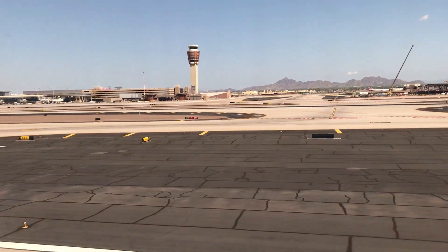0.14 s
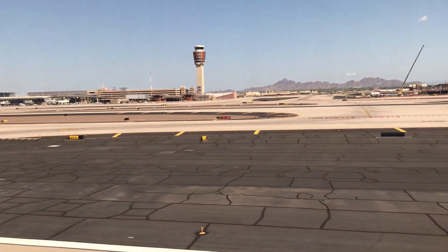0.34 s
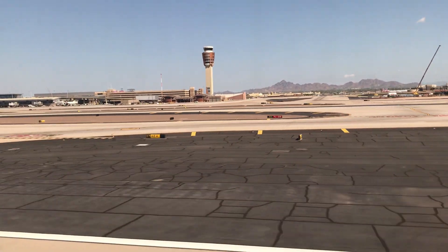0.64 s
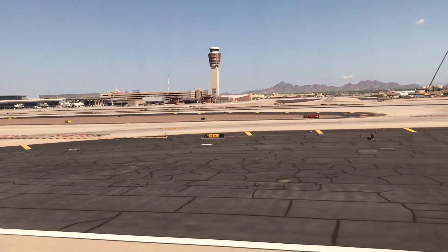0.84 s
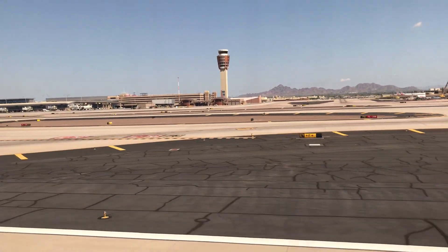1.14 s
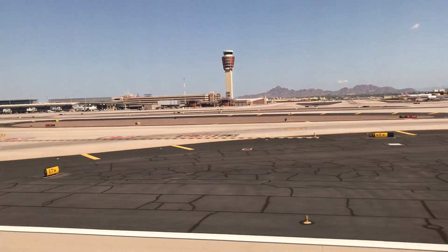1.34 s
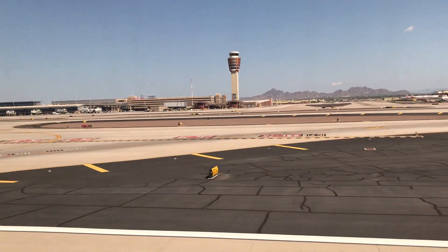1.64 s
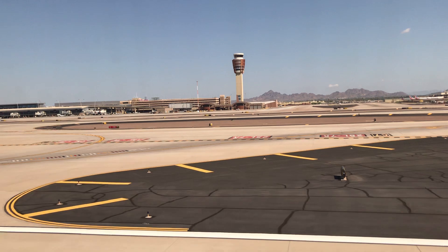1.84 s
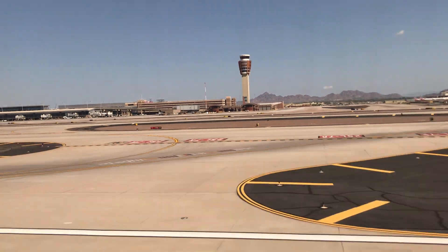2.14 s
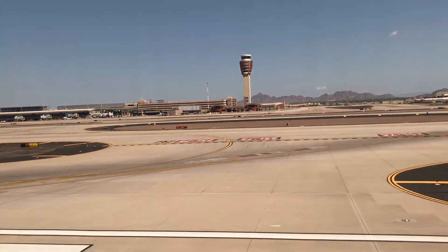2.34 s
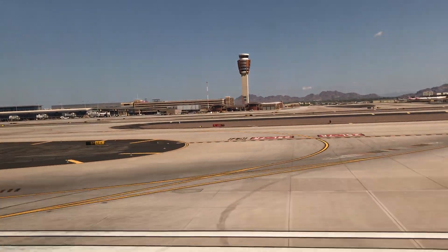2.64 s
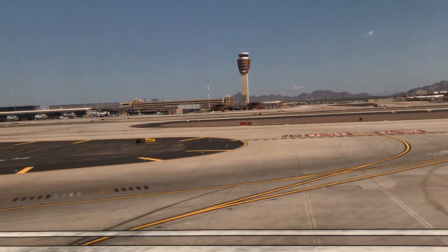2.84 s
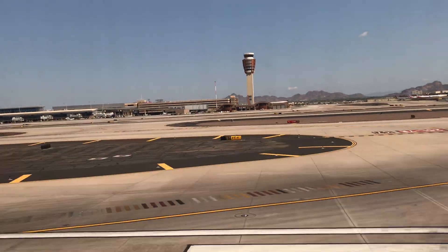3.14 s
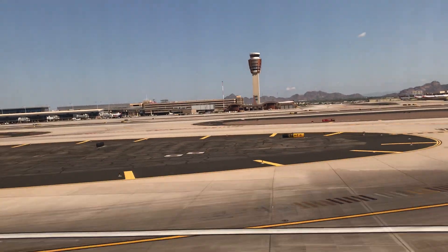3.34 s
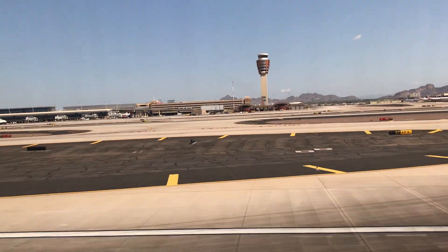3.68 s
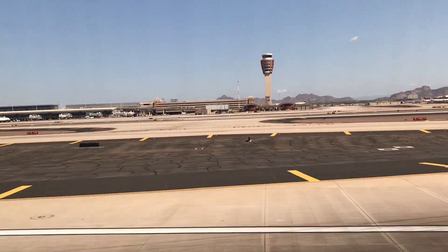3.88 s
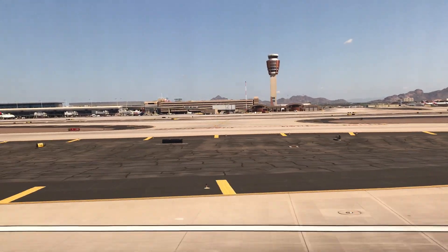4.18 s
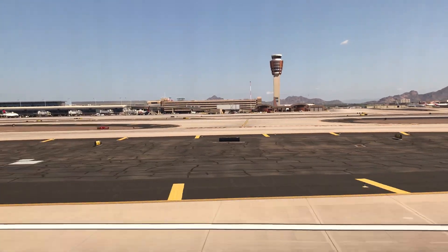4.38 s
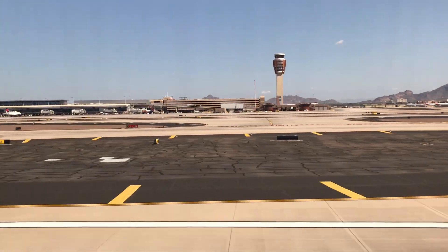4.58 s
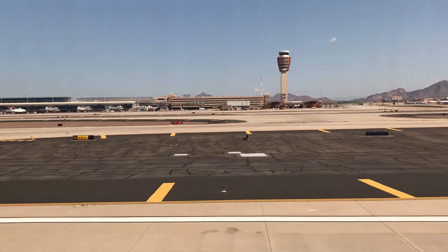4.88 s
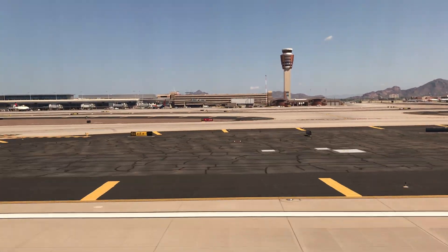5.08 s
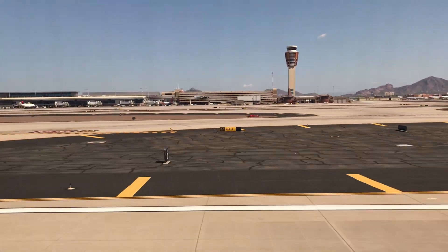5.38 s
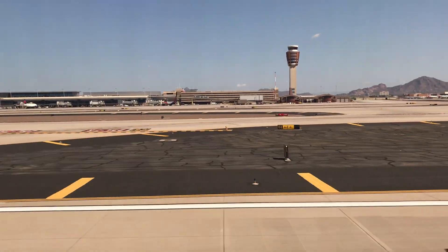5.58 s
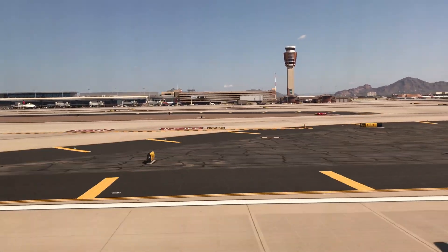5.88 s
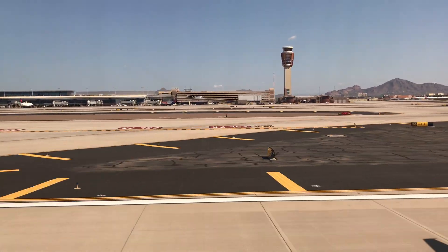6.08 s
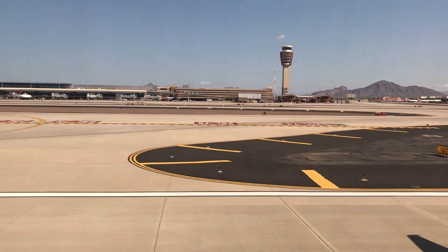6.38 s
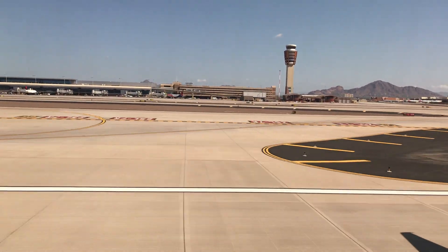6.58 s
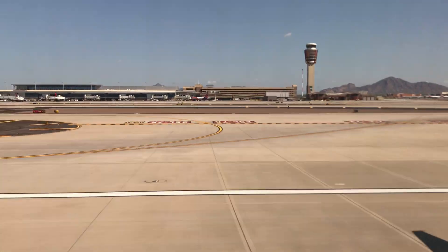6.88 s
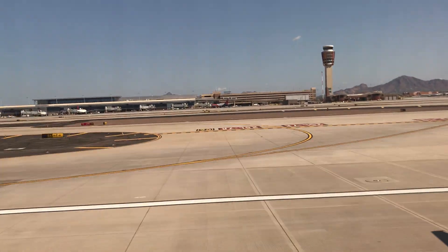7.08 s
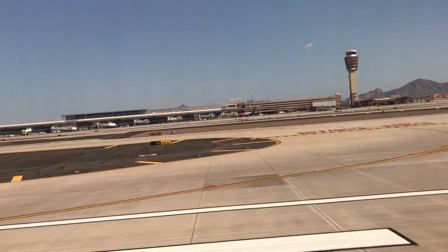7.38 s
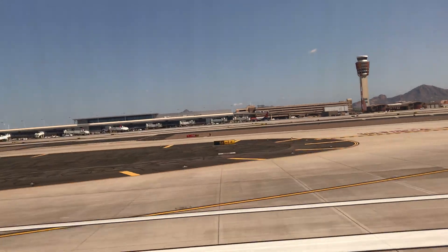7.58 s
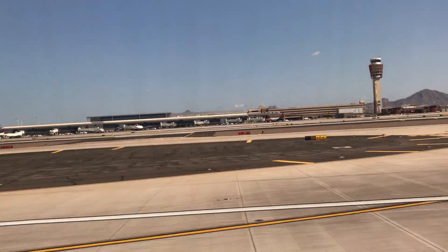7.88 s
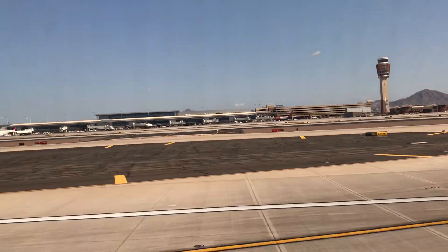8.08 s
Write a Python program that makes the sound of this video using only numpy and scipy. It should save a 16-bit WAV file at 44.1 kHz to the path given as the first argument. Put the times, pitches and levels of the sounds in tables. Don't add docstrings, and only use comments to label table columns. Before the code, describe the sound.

One microphone near the cabin wall of a moving airliner picks up low rumble swelling over pavement joints, dull engine roar, soft overhead air and faint machine whines. Sparse latch clicks and trim buzzes come first. After about six and a half seconds a big jolt brings a burst of dry rattles and huge low thuds, then smaller knocks over a stronger boom, the steady noise dipping and slowly returning.

```python
import sys
import numpy as np
from scipy import signal
from scipy.fft import rfft, irfft, next_fast_len
from scipy.io import wavfile
from scipy.ndimage import uniform_filter1d, minimum_filter1d

SR = 44100
rng = np.random.default_rng(int(sys.argv[2]) if len(sys.argv) > 2 else 0)


def boost_factor(decibels):
    exponent = np.asarray(decibels, float) / 20
    return 10 ** exponent


def unload_audio(sound):
    columns = np.transpose(np.atleast_2d(sound))
    steps = np.round(np.clip(columns, -1, 1) * 32767)
    wavfile.write(sys.argv[1], SR, steps.astype(np.int16))


N = 362502
CONTROL_STEP = 40


def in_time(rows):
    s, *columns = np.transpose(rows)
    return [np.interp(np.arange(N) / SR, s, column) for column in columns]


def rms_one(x):
    return x / np.sqrt(np.mean(x ** 2) + 1e-20)


def drift(rate_hz):
    r = np.exp(-2 * np.pi * rate_hz * CONTROL_STEP / SR)
    noise = rng.standard_normal(N // CONTROL_STEP + 2002)
    slow = rms_one(signal.lfilter([1], [1, -2 * r, r * r], noise)[2000:])
    return np.interp(np.arange(N) / CONTROL_STEP, np.arange(len(slow)), slow)


def bump():
    t = np.arange(N) / SR - 6.66
    rise_s, fall_s = 0.12, 0.31
    return np.exp(-(t / np.where(t < 0, rise_s, fall_s)) ** 2)


def tone(hz, level_db, waver_hz):
    rate_hz, flutter_db = 25.1, 2.0
    phase = 2 * np.pi * np.cumsum(hz + waver_hz * drift(rate_hz)) / SR
    return np.sqrt(2) * boost_factor(level_db + flutter_db * drift(rate_hz)) * np.sin(phase)


# pitch in Hz, level in dB, start in seconds, end in seconds, pitch waver in Hz.
PUMPS = [(2514, -60.5, 0, 1.4, 2.5), (2514, -57, 1.4, 2.08, 2.5), (2514, -62.5, 2.08, 2.9, 5),
         (2514, -69, 2.9, 5.6, 3), (2514, -64.5, 5.6, 9, 4), (6603, -75.5, -.5, 3.2, 4),
         (7600, -76.5, -.5, .55, 6), (1045, -66, -.5, 1.8, 4), (1045, -59, 2.3, 3.2, 4),
         (1098, -60.5, 3.25, 4.8, 4), (1098, -65, 4.8, 6.2, 4), (562, -53, .25, 1.7, 7),
         (555, -54, 5.65, 6, 14), (1366, -64, 3.6, 5.8, 10), (3495, -70, 3.45, 6.1, 80),
         (12850, -83.5, 3.2, 7, 150)]


def pumps():
    t = np.arange(N) / SR
    fade = 0.1 * np.array([-1, 1, -1, 1])
    out = np.zeros(N)
    for hz, level_db, start, end, waver_hz in PUMPS:
        gate = np.interp(t, np.array([start, start, end, end]) + fade, [0, 1, 1, 0])
        out += gate * tone(hz, level_db, waver_hz)
    return out


# pitch in Hz, level in dB, pitch waver in Hz.
DRONES = [
    (6600, -77.5, 4),
    (560, -60, 14),
    (1368, -71, 10),
    (1098, -75, 4),
]


def drones():
    return sum(tone(*row) for row in DRONES)


# time in seconds, pitch in Hz, level in dB.
WHISTLE = [
    (0, 15700, -105),
    (1.7, 15650, -85),
    (2.2, 15420, -82),
    (2.8, 15310, -78),
    (3.3, 15390, -80),
    (4.3, 15580, -82),
    (4.7, 15480, -85),
    (5.3, 15580, -83),
    (6.1, 15460, -81),
    (8.22, 15550, -86),
]


def turbines():
    t = np.arange(N) / SR
    whistle_hz, whistle_db = in_time(WHISTLE)
    running_down = tone(11850 - 680 * t, -78 - 8 * t ** 2, waver_hz=20)
    return tone(whistle_hz, whistle_db, waver_hz=40) + running_down


# centre in Hz, width in Hz, height in dB.
CABIN = [(290, 17, 2.5), (494, 28, -3.5), (590, 140, 2), (880, 60, -1), (990, 55, 6), (1032, 14, 0),
         (1100, 18, 4), (1140, 44, -3.5), (1284, 45, -5.5), (1420, 59, 1.5), (1704, 41, 5),
         (2170, 100, -0.5), (3480, 100, 1.5), (4950, 250, -3.5), (7550, 300, -1), (9050, 200, 0.5),
         (10470, 800, -6)]


def coloured(colour, flutter_db, rate_hz):
    size = next_fast_len(N)
    hz = np.maximum(np.arange(size // 2 + 1) * SR / size, 1)
    colour_hz, colour_db = np.transpose(colour)
    db = np.interp(np.log(hz), np.log(colour_hz), colour_db)
    for centre, width, height in CABIN:
        db = db + height / (1 + (2 * (hz - centre) / width) ** 2)
    ripple = uniform_filter1d(rng.standard_normal(len(hz)), size=450)
    db = db + 1.1 * rms_one(ripple) * (hz > 600)
    noise = irfft(rfft(rng.standard_normal(size)) * boost_factor(db), size)[:N]
    return rms_one(noise * boost_factor(flutter_db * drift(rate_hz)))


# frequency in Hz, density in dB per Hz.
HISS_COLOUR = [(1060, -22), (1800, 0), (2280, -2), (2590, -5.5), (2970, -3.5), (3410, -3.5), (4900, -8),
               (6630, -10), (7740, -14), (9370, -16), (10500, -17), (12700, -19.5), (15900, -21)]


def vents():
    level_db = -54.5 + 0.08 * np.arange(N) / SR + 9 * bump()
    return boost_factor(level_db) * coloured(HISS_COLOUR, flutter_db=0.2, rate_hz=14.0)


# frequency in Hz, density in dB per Hz.
ROAR_COLOUR = [(110, -30.5), (190, 0.5), (221, -9.5), (294, -9), (482, -18), (580, -21), (662, -24.5),
               (960, -28), (1280, -25.5), (1390, -27), (2160, -41.5), (2600, -37), (3380, -68),
               (5720, -120)]
# time in seconds, level in dB about the mean.
ROUGHNESS = [(0, 0.5), (.3, -1), (.64, 1), (.75, 1), (1.56, 0), (1.74, -1), (1.92, -1.5), (2.27, -1.5),
             (3.18, 0.5), (3.5, -2), (3.71, 0), (4.53, -0.5), (5.17, 1), (5.79, -2), (6.41, 2), (7.2, 0.5),
             (7.92, 3), (8.22, 1.5)]


def engines():
    level_db = -34.5 + 0.11 * in_time(ROUGHNESS)[0]
    return boost_factor(level_db) * coloured(ROAR_COLOUR, flutter_db=0.7, rate_hz=9.3)


# frequency in Hz, density in dB per Hz.
ROLL_COLOUR = [(13, -52), (22, -38), (27, -24), (29, -25), (36, -19.5), (54, 1.5), (70, 1.5), (92, -4.5),
               (135, -3), (191, -12), (210, -17), (270, -27.5), (460, -120)]


def rolling():
    rumble = coloured(ROLL_COLOUR, flutter_db=0.05, rate_hz=18.0)
    b, a = signal.iirpeak(61.0, 3.5, fs=SR)
    rumble = rumble - 0.95 * signal.lfilter(b, a, rumble)
    level_db = -21.5 + in_time(ROUGHNESS)[0] + 6.5 * bump() ** 2
    return boost_factor(level_db) * rumble


# start in seconds, ring peak in dB, dull part in dB, bright part in dB.
TICKS = [(1.9379, -42, -37, -53), (1.972, -52, -50, -55), (2.0373, -51, -37, -52), (2.5734, -37, -47, -57),
         (2.8606, -40, -50, -61), (2.905, -41, -42, -48), (4.7554, -51, -56, -66), (6.1852, -48, -60, -49),
         (6.4264, -48, -58, -49), (6.5474, -29, -30, -43), (6.611, -28, -26.5, -53),
         (7.0713, -37, -38, -46), (7.2608, -48, -46, -57), (7.8809, -38, -35, -49), (8.0574, -41, -46, -55)]
SHAKES = [(0.92, -40, -36, -69), (6.4782, -28.5, -33, -40.5), (6.4997, -29, -25, -42),
          (6.52, -24.5, -28.5, -40), (6.5749, -20.5, -25.5, -31.5), (6.635, -43, -38, -56),
          (6.6613, -47, -48, -42), (6.7098, -33.5, -32, -56), (6.8276, -37, -39, -63),
          (6.9045, -36, -34.5, -56), (7.1349, -43, -42, -74), (7.5255, -40, -47, -71),
          (7.553, -45, -33, -64), (7.706, -38, -44.5, -62), (7.835, -41, -43, -57)]
BUZZES = [
    (0.4115, -45, -49, -63),
    (0.864, -45, -41, -54),
    (1.538, -37, -32, -46),
    (1.5475, -43, -45, -53),
    (2.6, -41, -38, -54),
    (6.5894, -27.5, -38, -45),
    (7.0025, -41, -41, -50),
    (7.3784, -49, -52, -57),
    (8.1632, -37, -39, -50),
]
PANEL = [
    (6.8016, -36.5, -35.5, -64),
    (6.9282, -37.5, -42, -46.5),
    (7.7021, -43, -42, -51),
]
# ring in Hz, shake length in seconds.
PARTS = [
    (3340, .009),
    (3420, 0.023),
    (5650, 0.016),
    (5468, 0.029),
]
# start in seconds, ring peak in dB, ring in Hz.
LATCHES = [
    (.7267, -35.5, 4250),
    (.7275, -38, 5450),
    (.7763, -35.5, 4250),
    (.777, -38, 5500),
    (3.8786, -33.5, 3380),
    (3.879, -48, 5600),
    (4.9462, -36.5, 3600),
    (4.947, -40, 5600),
    (6.662, -39, 8700),
]
RATTLE_EDGES_HZ = (450, 2300, 6500, 15800)


def rattle(ring_db, dull_db, bright_db, ring_hz, length_s, sharpness):
    t = np.arange(SR // 4) / SR
    dull_sos = signal.butter(5, RATTLE_EDGES_HZ[:2], "band", fs=SR, output="sos")
    bright_sos = signal.butter(3, RATTLE_EDGES_HZ[2:], "band", fs=SR, output="sos")
    knocks = rng.standard_normal(len(t) // 45 + 1).repeat(45)[:len(t)]
    chatter = rng.standard_normal((3, len(t))) * boost_factor(3 * knocks)
    softened = signal.lfilter([1], [1, -0.88], chatter[0])
    dull = boost_factor(dull_db - 8) * rms_one(signal.sosfilt(dull_sos, softened))
    bright = boost_factor(bright_db - 10.5) * rms_one(signal.sosfilt(bright_sos, chatter[1]))
    b, a = signal.iirpeak(ring_hz, sharpness, fs=SR)
    ring = boost_factor(ring_db - 17) * rms_one(signal.lfilter(b, a, signal.lfilter(b, a, chatter[2])))
    onset = 1 - np.exp(-t / 0.00076)
    shake = np.exp(-(t / max(length_s, 0.002)) ** 2)
    cabin_tail = 0.52 * np.exp(-t / 0.058)
    swell = 1 - np.exp(-t / 0.005)
    return onset * (shake + cabin_tail) * (swell * dull + ring + bright)


def rattles():
    out = np.zeros(N + SR)

    def place(start_s, sound):
        at = round(start_s * SR)
        out[at:at + len(sound)] += sound

    for start_s, ring_db, ring_hz in LATCHES:
        place(start_s, rattle(ring_db, -52, -60, ring_hz, length_s=0.009, sharpness=3.5))
    for rows, (ring_hz, length_s) in zip((TICKS, SHAKES, BUZZES, PANEL), PARTS):
        for start_s, *levels_db in rows:
            place(start_s, rattle(*levels_db, ring_hz, length_s, sharpness=1.1))
    return out[:N]


def swells(rows):
    s, db, half = np.transpose(rows)[:, :, None]
    t = np.arange(N // CONTROL_STEP + 2) * CONTROL_STEP / SR
    bells = boost_factor(db) * np.exp(-2 * ((t - s) / half) ** 2)
    return np.interp(np.arange(N) / SR, t, np.sum(bells, axis=0))


# centre in seconds, pitch in Hz, peak in dB, half length in seconds.
JOINTS = [(0.063, 65.4, -27, 0.12), (0.218, 57.2, -24, 0.055), (0.484, 55.6, -26.5, 0.11),
          (0.779, 67.6, -30, .08), (0.896, 59, -31, 0.068), (1.085, 58.2, -25, 0.077),
          (1.24, 55.9, -23, 0.069), (1.483, 64.1, -22, .08), (1.645, 64.37, -21, 0.05),
          (1.846, 62.2, -23.5, 0.17), (2.101, 57, -25, 0.27), (2.36, 57.8, -22, 0.11),
          (2.631, 58.9, -22.5, 0.11), (2.975, 58, -32, .06), (3.114, 65.1, -21, 0.098),
          (3.302, 62.3, -24, 0.12), (3.552, 60.35, -25, 0.19), (3.808, 59.5, -23.5, 0.091),
          (3.973, 59.1, -18, 0.053), (4.14, 59.2, -23, 0.057), (4.27, 59, -28, 0.063),
          (4.5, 65, -23.5, 0.094), (4.771, 62.36, -24.5, .13), (5.08, 60.53, -25, 0.15),
          (5.37, 62.8, -29, 0.077), (5.593, 62.3, -25.5, 0.059), (5.718, 68.8, -39, 0.045),
          (5.917, 65, -19.5, 0.049), (6.17, 56.9, -46, 0.084)]
JOLTS = [(6.388, 59, -32, 0.037), (6.521, 60.96, -15, 0.098), (6.639, 64, -7.5, 0.049),
         (6.725, 64.9, -7.5, 0.045), (6.857, 58.5, -13.5, 0.059), (6.93, 58.9, -8.5, 0.053),
         (7.049, 60.95, -23.5, 0.11), (7.217, 60.52, -18.5, 0.067), (7.348, 63.5, -17, 0.11),
         (7.504, 62.23, -18, 0.093), (7.651, 62.4, -14.5, 0.089), (7.88, 62.4, -15, 0.087),
         (7.992, 62.9, -11.5, 0.055), (8.123, 62.07, -15, 0.088), (8.22, 64.2, -14, 0.061)]


def boom():
    rows = np.array(JOINTS + JOLTS)
    hz, = in_time(rows[:, :2])
    phase = 2 * np.pi * np.cumsum(hz + 2.44 * drift(11.0)) / SR
    rest = boost_factor(-50)
    swing = (rest + swells(rows[:, [0, 2, 3]])) * boost_factor(0.6 * drift(9))
    overtone_level = bump() ** 2 * swing ** 1.49 * boost_factor(1.5 + 1.5 * drift(14.0))
    overtone = overtone_level * np.sin(2 * phase + 0.4 * drift(6))
    skirt_sos = signal.butter(2, [32, 120], "band", fs=SR, output="sos")
    skirt = rms_one(signal.sosfilt(skirt_sos, rng.standard_normal(N)))
    skirt_level = boost_factor(-14.5 + 2.2 * bump()) * swing
    return np.sqrt(2) * (swing * np.sin(phase) + overtone) + skirt_level * skirt


# time in seconds, gain in dB.
GAIN = [
    (0, 0.5),
    (6.5, 0),
    (6.8, -4.5),
    (6.95, -7),
    (7.1, -5),
    (7.35, -4.5),
    (7.58, -4),
    (7.78, -1),
    (8.22, -1.5),
]


def scene():
    whines = pumps() + drones() + turbines()
    steady = whines + vents() + engines() + rolling()
    return (boost_factor(in_time(GAIN)[0]) * steady + rattles() + boom())[None]


def low_pass(x):
    return signal.sosfilt(signal.butter(12, 16040, fs=SR, output="sos"), x)


def record(dry):
    room = minimum_filter1d(np.minimum(0.7 / (np.abs(dry) + 1e-9), 1), size=441)
    limited = dry * uniform_filter1d(room, size=441)
    from_edge = np.arange(N) / 150
    ease_in = 1 - 0.6 * np.exp(-from_edge ** 2)
    ease_out = 1 - 0.7 * np.exp(-from_edge[::-1] ** 2)
    top_cut = signal.ellip(14, 0.3, 70, 15740, fs=SR, output="sos")
    finished = signal.sosfilt(top_cut, limited * ease_in) * ease_out
    return low_pass(finished)


dry = scene()
out = record(dry)
unload_audio(out)
```